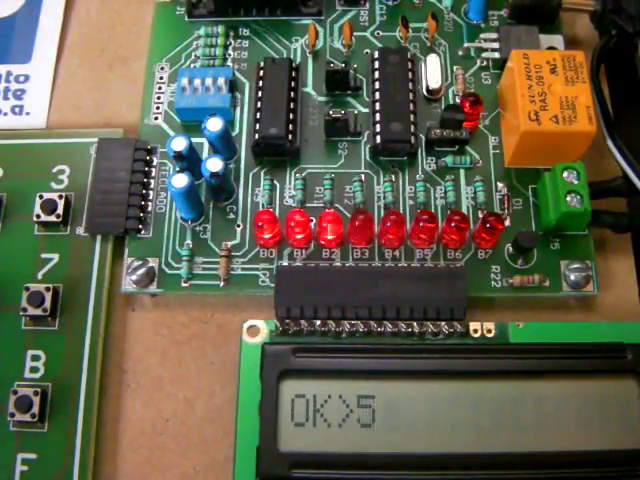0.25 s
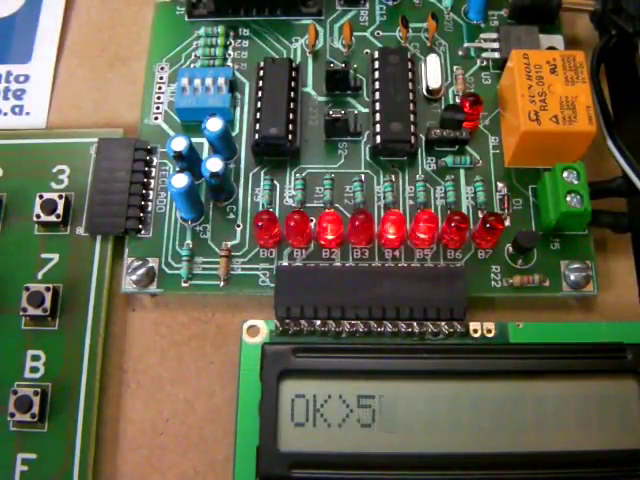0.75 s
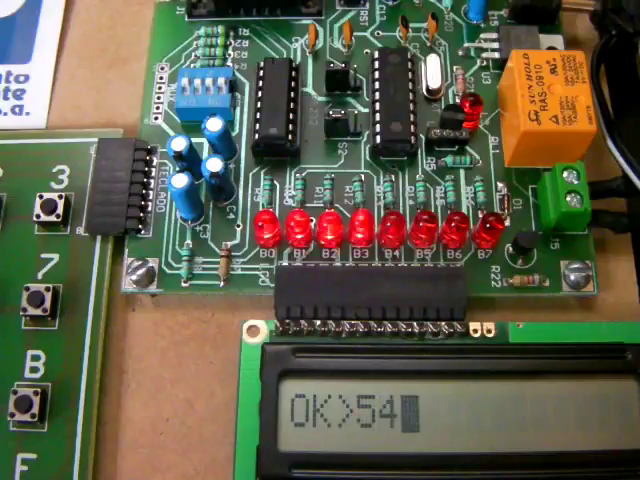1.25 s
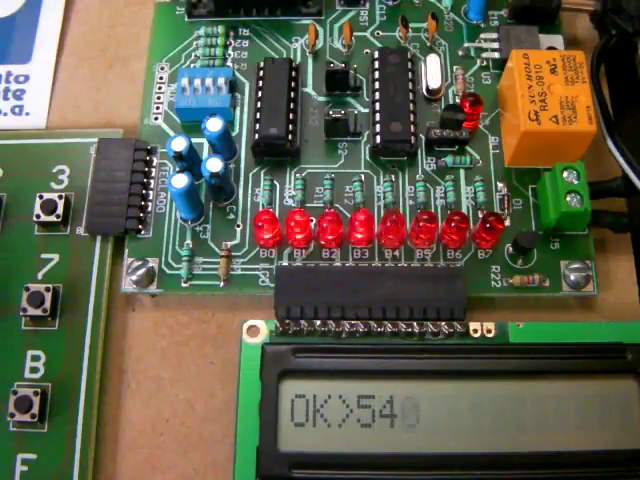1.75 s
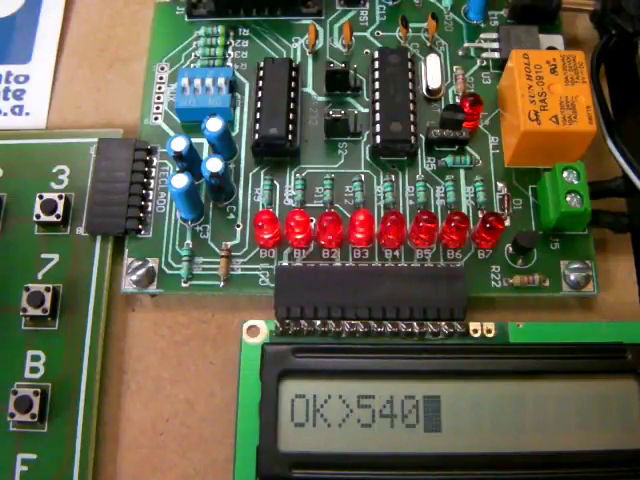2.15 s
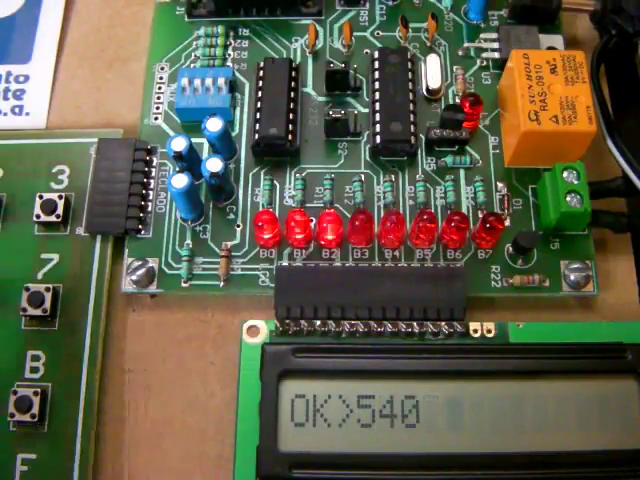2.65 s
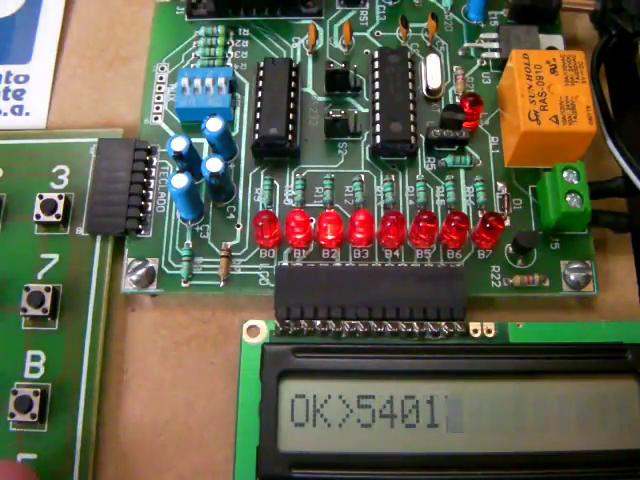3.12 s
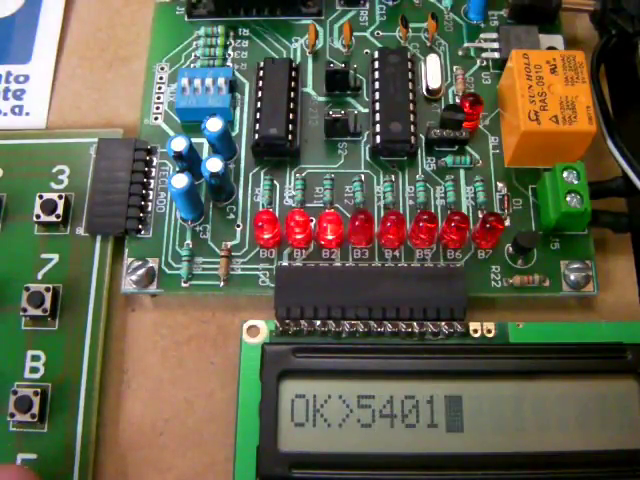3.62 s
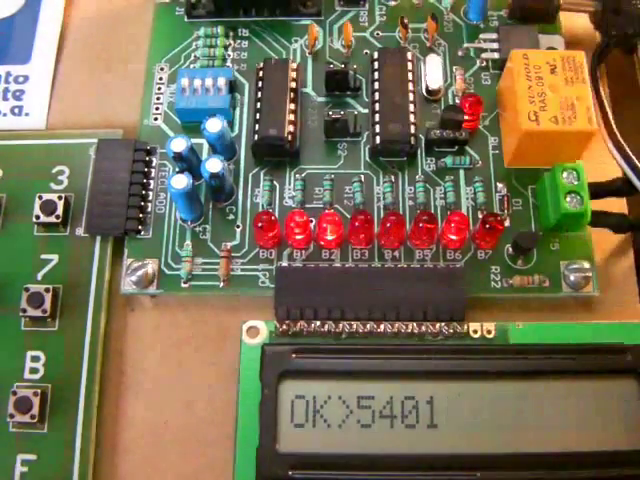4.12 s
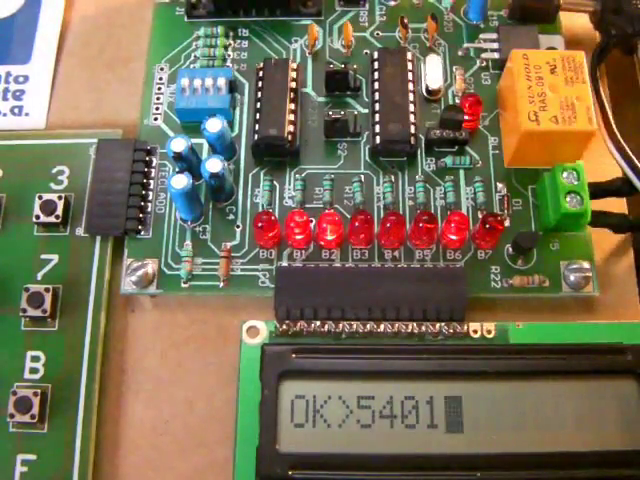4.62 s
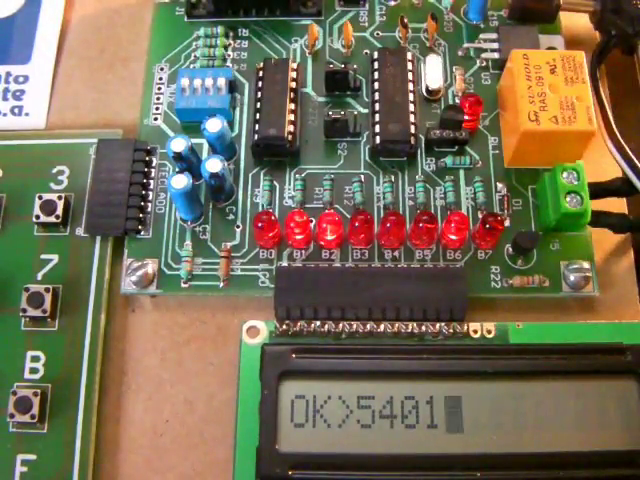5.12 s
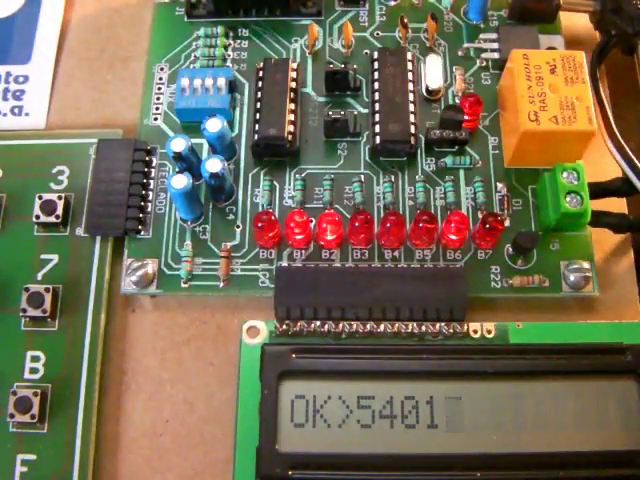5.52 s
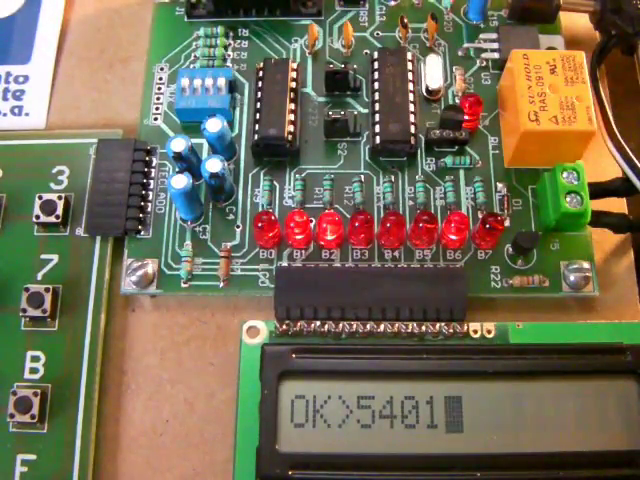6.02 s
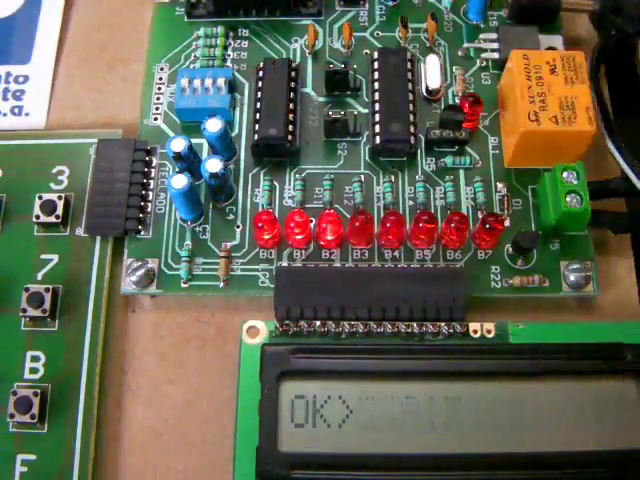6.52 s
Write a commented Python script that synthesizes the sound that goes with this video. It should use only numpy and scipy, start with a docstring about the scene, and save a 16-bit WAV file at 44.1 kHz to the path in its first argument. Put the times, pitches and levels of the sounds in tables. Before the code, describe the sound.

Close, sharp pairs of clicks from small keypad buttons, with soft finger brushing and a steady low hum behind them.

```python
"""Tactile pushbuttons on a circuit board

Five times a button is pressed and let go, close to a camera that overloads on the clicks.
Each metal dome snaps through, and the impulse excites the modes of the board, the switch frames
and the desk; a small room reverberates. The hand brushes about between keys, over a low
electric hum and room rumble."""
import sys
import numpy as np
from scipy import signal
from scipy.fft import rfft, irfft, next_fast_len
from scipy.io import wavfile
from scipy.ndimage import map_coordinates

SR = 44100
rng = np.random.default_rng(int(sys.argv[2]) if len(sys.argv) > 2 else 0)


def persist_wave(psi):
    """Save psi, clipped to +-1, as 16-bit WAV."""
    counts = np.round(np.clip(psi, -1, 1) * 32767).astype(np.int16)
    wavfile.write(sys.argv[1], SR, np.atleast_2d(counts).T)


N = 298557
T = np.arange(SR // 3) / SR  # seconds within one contact


def amp(db):
    """Amplitude ratio of a level in decibels."""
    return 10 ** (np.asarray(db) / 20)


def unit(x):
    """Normalisation to rms 1."""
    return x / np.sqrt(np.mean(x ** 2) + 1e-20)


def along(points, hz):
    """Interpolation of (frequency, value) points on a logarithmic frequency axis."""
    point_hz, values = np.transpose(points)
    return np.interp(np.log(hz + 1), np.log(point_hz + 1), values)


def filtered(x, response):
    """Linear filtering: the spectrum is multiplied by a frequency response."""
    size = x.shape[-1]
    padded = next_fast_len(size + 8192)
    return irfft(rfft(x, padded) * response(np.fft.rfftfreq(padded, 1 / SR)), padded)[..., :size]


def wobble(rate_hz):
    """Random modulation: a spline through rate_hz Gaussian knots a second."""
    position = np.arange(N) * rate_hz / SR
    knots = rng.standard_normal(int(N * rate_hz / SR) + 4)
    coarse = position[::64]
    return np.interp(position, coarse, map_coordinates(knots, [coarse]))


def add(track, start_s, sound):
    """Superposition of a sound on the track from start_s."""
    part = track[:, max(round(start_s * SR), 0):][:, :sound.shape[-1]]
    part += sound[..., :part.shape[-1]]


def ring(modes, attack_s, in_phase=False, scatter_db=2):
    """Free vibration: damped modes, struck at new strengths each time; close modes beat."""
    hz, db, t60 = np.transpose(modes)[:, :, None]
    level = amp(db + scatter_db * rng.standard_normal(hz.shape))
    phase = rng.random(hz.shape) * (not in_phase)
    waves = np.sin(2 * np.pi * (hz * T + phase)) * amp(-60 * T / t60)
    return (level * waves).sum(0) / np.linalg.norm(level) * (1 - np.exp(-T / attack_s))


# Stereo width of noise, before side_db is added: frequency_hz, side_to_mid_db
STEREO_WIDTH = [(30, -3), (80, -26), (300, -17), (1000, -10.5), (4000, -3), (14000, -6)]
def noise(spectrum, size, side_db):
    """Partly coherent stereo noise of rms 1, widest in the deep bass and the treble."""
    def colour(hz):
        side_gain = amp(along(STEREO_WIDTH, hz) + side_db)
        return amp(along(spectrum, hz)) * [np.ones_like(hz), side_gain]
    mid, side = filtered(rng.standard_normal((2, size)), colour)
    return unit(np.array([mid + side, mid - side]))


# Electric hum lines: frequency_hz, rms_level_db
HUM_LINES = [(97, -50), (119, -45.5), (328.4, -48.5), (689, -63.5)]
# Spectra of room rumble and microphone hiss: frequency_hz, relative_density_db
RUMBLE_SPECTRUM = [(13, -54.5), (22, -29), (43, -19.5), (64, -15), (80, -9.5), (125, -2), (222, -8.5),
                   (237, -11), (268, -8.5), (299, -9.5), (333, -11), (401, -14), (427, -18.5), (548, -21),
                   (900, -30.5), (1170, -45), (1980, -120)]
HISS_SPECTRUM = [(400, -13), (750, -6.5), (1300, -5), (2500, -11), (4500, -15), (9000, -19), (14000, -19),
                 (16000, -27.5)]
def background():
    """Noise floor: a slightly unsteady line spectrum of hum over continuous rumble and hiss."""
    t = np.arange(N) / SR
    hum = np.zeros(N)
    for hz, db in HUM_LINES:
        peak = np.sqrt(2) * amp(db + 0.25 * wobble(3.5))
        hum += peak * np.sin(2 * np.pi * hz * t + 0.74 * wobble(3.92))
    rumble = amp(-37.5) * noise(RUMBLE_SPECTRUM, N, side_db=4.5)
    hiss = amp(-50.5) * noise(HISS_SPECTRUM, N, side_db=3)
    return hum + rumble + hiss


# Reverberation time of the small room: frequency_hz, t60_s
ROOM_DECAY = [(200, 0.67), (1000, 0.33), (3500, 0.35), (8000, 0.33), (15000, 0.25)]
def room(x, side_db, early_db=6, early_t60_s=0.056, ripple_db=2.2):
    """Diffuse reverberation with the colour and energy of x: early desk returns, then the walls."""
    colour = np.linalg.norm(signal.stft(x, SR, nperseg=256)[2], axis=(0, 2))[:, None]
    colour = colour * amp(ripple_db * rng.standard_normal(colour.shape))  # reflections favour some bands
    hz, t, diffuse = signal.stft(rng.standard_normal((2, len(T))), SR, nperseg=256)
    walls = amp(-60 * t / along(ROOM_DECAY, hz)[:, None])
    early = amp(early_db - 60 * t / early_t60_s)
    tail = signal.istft(diffuse * colour * (walls + early), SR, nperseg=256)[1][:, :len(T)]
    mid, side = tail * (1 - np.exp(-T / 0.0026))
    return x.std() * unit(np.array([mid + amp(side_db) * side, mid - amp(side_db) * side]))


# Strokes of the hand: peak_s, level_db, length_s
HAND_STROKES = [(0.4, -57, 1.32), (1.8, -59, .45), (2.793, -50.5, .33), (4.15, -43.5, 0.56),
                (4.9, -57, 0.33), (6.8, -49, 0.36)]
# Spectrum of the brushing: frequency_hz, relative_density_db
BRUSH_SPECTRUM = [(500, -7), (1500, 0.5), (3000, 0.5), (6000, 0.5), (11000, -2), (16000, -7)]
def brushing(edge_fade_db=6):
    """Friction noise: each stroke is a fluttering Gaussian swell, and strokes add in power."""
    peak_s, db, length_s = np.transpose(HAND_STROKES)[:, :, None]
    offset = 2 * (np.arange(N) / SR - peak_s) / length_s
    envelope = np.linalg.norm(amp(db - edge_fade_db * offset ** 2), axis=0)
    return envelope * amp(0.6 * wobble(21)) * noise(BRUSH_SPECTRUM, N, side_db=-33)


def soft_contact(peak_s):
    """Envelope of a compliant impact: the softer the contact, the later its peak."""
    return T / peak_s * np.exp(1 - T / peak_s)


# Light fingertip contacts: start_s, level_db
FINGER_TOUCHES = [(0.746, -37), (0.756, -35), (1.085, -50.5), (1.986, -51), (2.023, -46), (2.553, -33),
                  (3, -44.5)]
# Spectrum of a fingertip tap: frequency_hz, relative_density_db
TAP_SPECTRUM = [(500, -20), (1500, -15), (2600, -4.5), (3700, 0), (4500, -7), (5600, -2), (6500, -11),
                (7600, -4.5), (8600, -25), (16000, -24)]
def fingertips():
    """Light impacts on the keys: short noise pulses with their reverberation."""
    out = np.zeros((2, N))
    for start_s, db in FINGER_TOUCHES:
        tap = amp(db) * soft_contact(peak_s=0.0036) * noise(TAP_SPECTRUM, len(T), side_db=-3)
        add(out, start_s, tap + amp(-7.5) * room(tap, side_db=-8))
    return out


# The hand settling on the desk: start_s, relative_level_db
HAND_BUMPS = [(3.195, -25.5), (3.25, -30)]
# Spectrum of its rub: frequency_hz, relative_density_db
RUB_SPECTRUM = [(40, -23), (100, 5), (200, -4.5), (700, -11.5), (1600, -27), (4000, -54.5)]
# Low desk modes under the hand: frequency_hz, relative_level_db, t60_s
BOOM_MODES = [(86, -6, .24), (104, 19, 0.25), (128, -13, 0.42)]
def desk_bumps():
    """Soft impact: the heel of the hand rubs the desk and excites its lowest modes."""
    out = np.zeros((2, N))
    for start_s, db in HAND_BUMPS:
        rub = amp(-10.5) * soft_contact(peak_s=0.02) * noise(RUB_SPECTRUM, len(T), side_db=-2)
        boom = amp(9.5) * ring(BOOM_MODES, attack_s=0.014)
        add(out, start_s, amp(db) * (rub + boom))
    return out


def swish(click_noise):
    """Time reversal of a short decay: a faint swish swells just before each click."""
    fade = amp(-17 - 60 * T / 0.1) * np.clip((0.035 - T) / 0.0121, 0, 1)
    return (click_noise * fade)[:, ::-1]


# The board's high knock modes and slow bending modes: frequency_hz, relative_level_db, t60_s
KNOCK_MODES = [(1075, -4.5, 0.16), (1188, 2, 0.08), (1285, 1, 0.076), (1377, -9, 0.21), (1473, 9.5, 0.057),
               (1585, -4.5, 0.16), (1794, -4.5, 0.22), (2070, -21, 0.08)]
BENDING_MODES = [(457, -17, 0.091), (550, 2, 0.23), (768, 13, 0.17), (800.6, 14, 0.16), (854, 2.5, 0.33)]
def circuit_board(knock_db, thud_db):
    """Plate vibration: a sharp knock, and bending that grows with both knock and desk thud."""
    knock = amp(knock_db - 0.5) * ring(KNOCK_MODES, attack_s=0.0001)
    bending_db = 0.5 + 0.49 * knock_db + 0.61 * thud_db
    bending = amp(bending_db) * ring(BENDING_MODES, attack_s=0.0056)
    return (knock + bending)[None]


# Modes of the desk top: frequency_hz, relative_level_db, t60_s
DESK_MODES = [(170.5, -7, 0.42), (247, -12.5, 0.33), (304.8, -6.5, 0.23), (326, 3.5, 0.25),
              (354.9, -2, 0.33), (403, -9, 0.24)]
def desk_thud(thud_db):
    """Structure-borne sound: the desk's modes start in phase and swell again as they beat."""
    return amp(thud_db + 6) * ring(DESK_MODES, attack_s=0.0053, in_phase=True)[None]


# Modes of the switch frames and pins: frequency_hz, relative_level_db, t60_s
FRAME_MODES = [(2370, 4, 0.27), (2420, 6, .2), (2700, -12, 0.097), (3015, -16, 0.14), (3620, -9, .3),
               (3780, -5, 0.66), (4300, -21, 0.206), (4630, -1, 0.33), (5460, 3, 0.258), (7200, -6.5, 0.14),
               (9100, -6.5, 0.23)]
def switch_frames(snap_db):
    """Resonance: the metal parts ring on faintly, in proportion to the snap."""
    return amp(snap_db - 27.5) * ring(FRAME_MODES, attack_s=0.001)


def burst(hold_s, t60_s):
    """Transient envelope of a dome flipping over: abrupt onset, brief hold, exponential decay."""
    rise = 1 - np.exp(-T / 0.0001)
    return rise * amp(-60 * np.maximum(T - hold_s, 0) / t60_s)


# Spectra of the dome's snap and of its fine tick: frequency_hz, relative_density_db
SNAP_SPECTRUM = [(150, -54), (500, -14.5), (1000, -22.5), (1900, -5.5), (2600, 2), (3600, -1.5),
                 (4200, -8.5), (5200, -4), (7000, -17), (16000, -25)]
TICK_SPECTRUM = [(300, -20.5), (1500, -14.5), (3500, -10.5), (6000, -10), (9500, -6), (12000, -11),
                 (14500, -9.5), (16000, -15.5)]
def dome(snap_db, tick_db, pitch_hz, ring_db, lift_db=3, half_width_oct=0.048):
    """Snap-through of a steel dome: a crack and a pitched ring."""
    def resonance(hz):
        detuning = np.log2((hz + 1) / pitch_hz) / half_width_oct
        return amp(lift_db / (1 + detuning ** 2))
    snap = amp(snap_db) * unit(filtered(noise(SNAP_SPECTRUM, len(T), side_db=-5), resonance))
    tick = amp(tick_db + 6.5) * noise(TICK_SPECTRUM, len(T), side_db=1.5)
    crack = snap * burst(hold_s=0.0019, t60_s=0.019) + tick * burst(hold_s=0.0016, t60_s=0.0047)
    ring_decay = burst(hold_s=0.0019, t60_s=0.01) + amp(-25) * burst(hold_s=0, t60_s=0.26)
    tone = amp(ring_db) * ring_decay * np.sin(2 * np.pi * pitch_hz * T)
    return crack, tone, snap + tick


# Dome snaps, press and release in turn; levels are relative within each column:
# start_s, snap_db, tick_db, knock_db, thud_db, pitch_hz, ring_db
BUTTON_CLICKS = [ (0.467, -11.5, -10.5, -16.5, -28.5, 2750, -20),
                 (0.6836, -10.5, -24, -12.5, -21.5, 2470, -9), (1.3838, -8, -10.5, -19.5, -31, 3690, -13),
                 (1.5981, -5, -26, -18, -26.5, 3665, -3), (2.3249, -15, -10, -15.5, -31, 3380, -27.5),
                 (2.5349, -25.5, -31.5, -19, -21, 2850, -30), (3.495, -20.5, -7.5, -18, -40.5, 3600, -10.5),
                 (3.7804, -8.5, -15, -18.5, -35.5, 3090, -5.5), (4.0082, -12, -5.5, -33, -32, 2430, -7),
                 (6.3748, -9.5, -10.5, -22, -23, 5380, -6.5)]
def buttons():
    """Impulse excitation: each snap shakes the board, frames and desk, and the room reverberates."""
    out = np.zeros((2, N + len(T)))  # starts one contact length early, for the swish
    for start_s, snap_db, tick_db, knock_db, thud_db, pitch_hz, ring_db in BUTTON_CLICKS:
        crack, tone, click_noise = dome(snap_db, tick_db, pitch_hz, ring_db)
        board = circuit_board(knock_db, thud_db)
        frames = switch_frames(snap_db)
        thud = desk_thud(thud_db)
        bright_tail = amp(-9) * room(crack + amp(-6) * tone, side_db=-9)
        low_tail = amp(-5.5) * room(board, side_db=-8.5) + amp(-10) * room(thud, side_db=-9)
        add(out, start_s, swish(click_noise))
        add(out, start_s + len(T) / SR, crack + tone + frames + board + thud + bright_tail + low_tail)
    return out[:, len(T):]


def scene():
    """Superposition of all sources, the right channel a little stronger."""
    foreground = buttons() + brushing() + fingertips() + desk_bumps()
    return foreground * amp([[-0.15], [0.15]]) + background() * amp([[-0.38], [0.38]])


def record(dry):
    """Hard saturation and band limiting: the clicks overload the input just under full scale."""
    ceiling, band_limit_hz = 0.93, 15900
    return filtered(np.clip(dry, -ceiling, ceiling), lambda hz: hz < band_limit_hz)


dry = scene()
out = record(dry)
persist_wave(out)
```